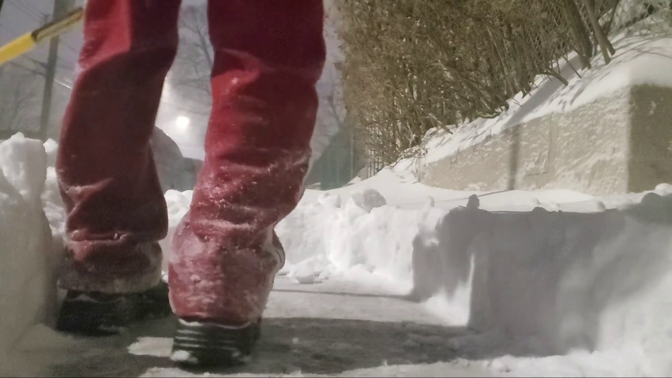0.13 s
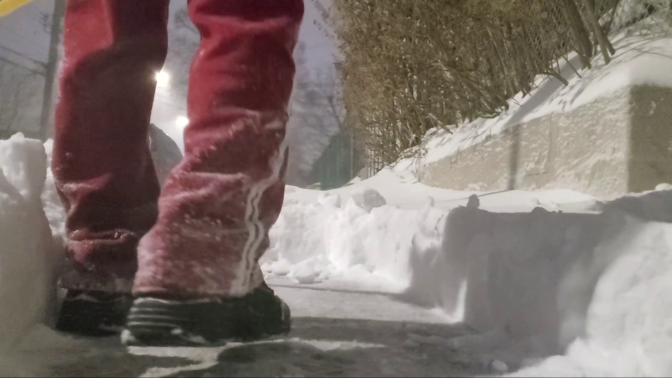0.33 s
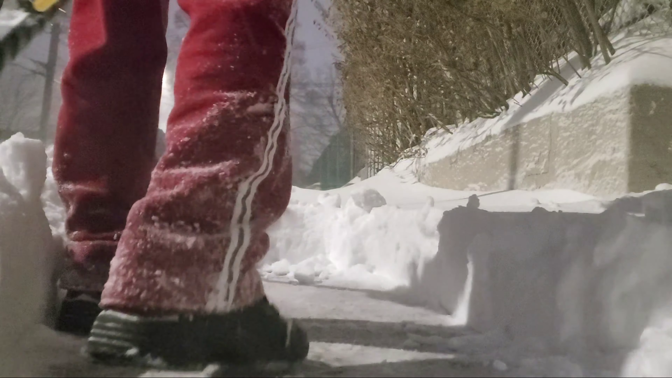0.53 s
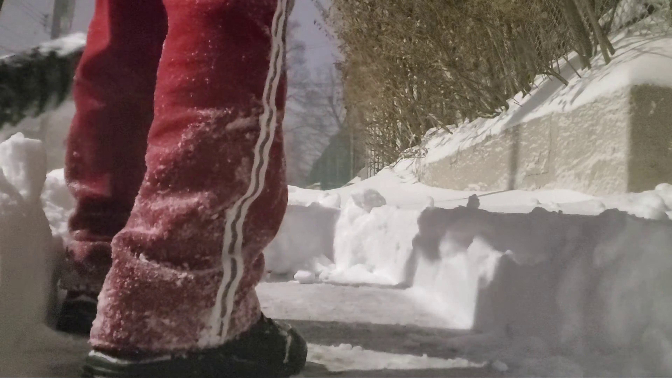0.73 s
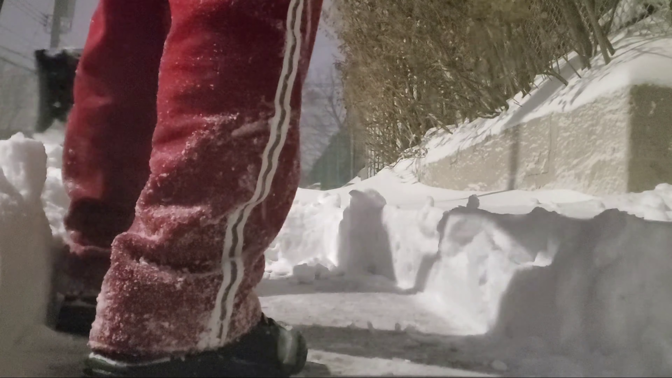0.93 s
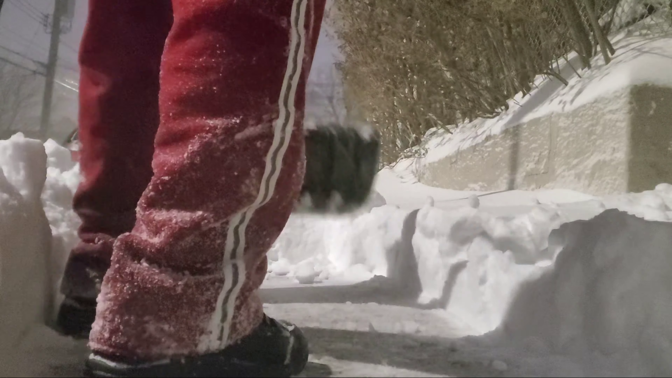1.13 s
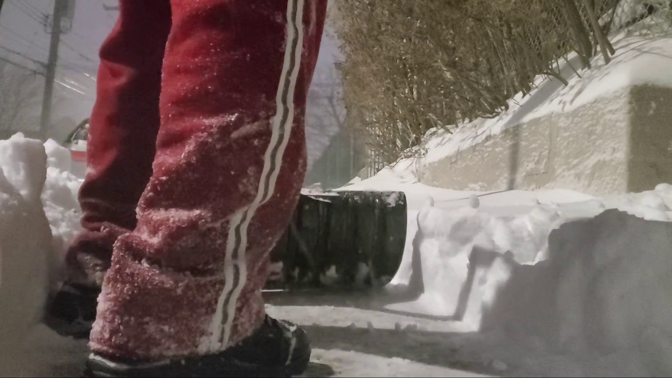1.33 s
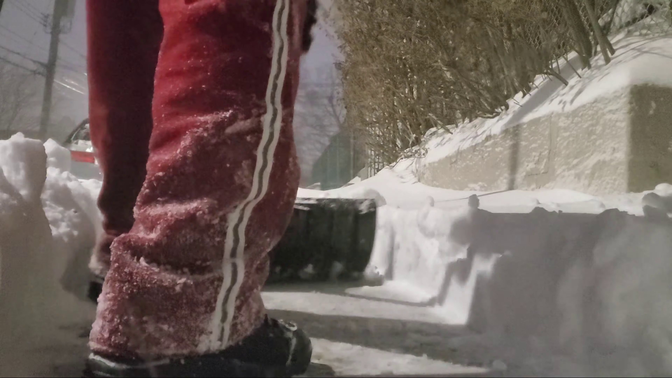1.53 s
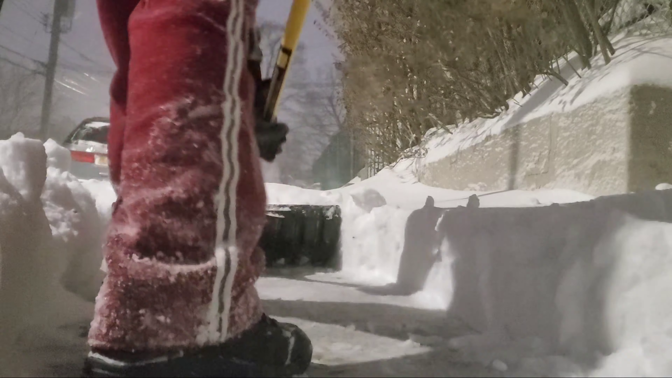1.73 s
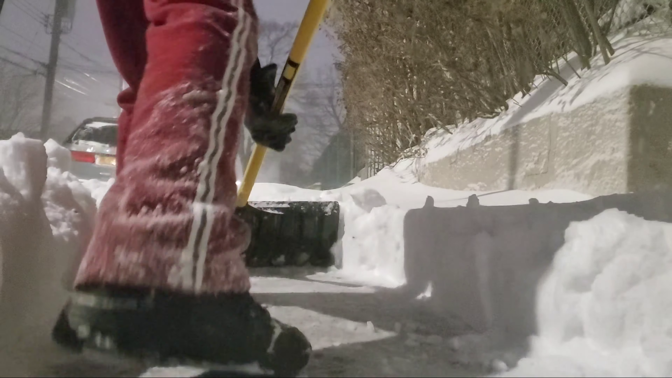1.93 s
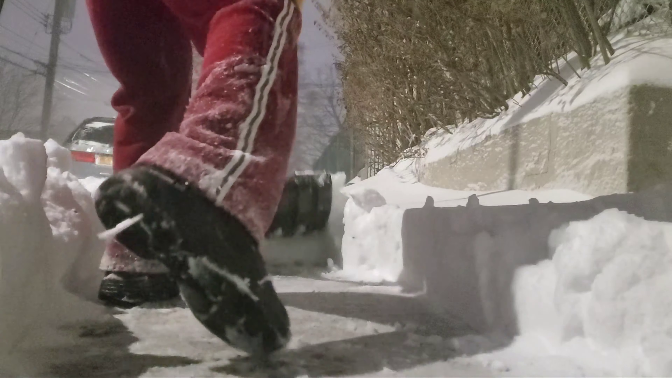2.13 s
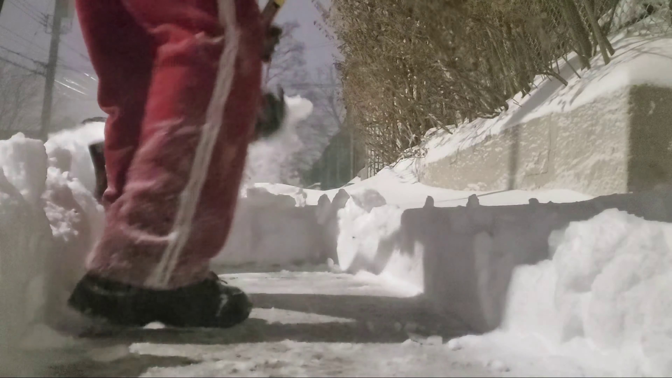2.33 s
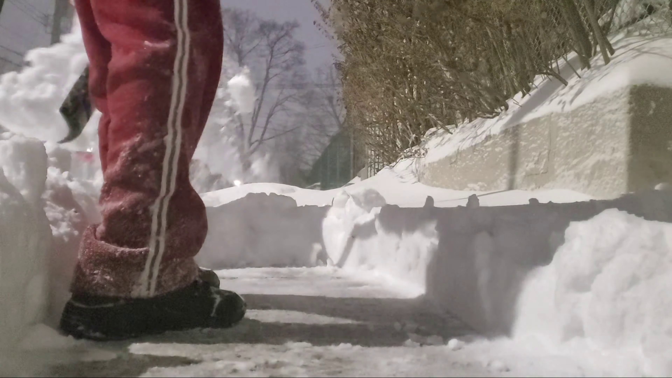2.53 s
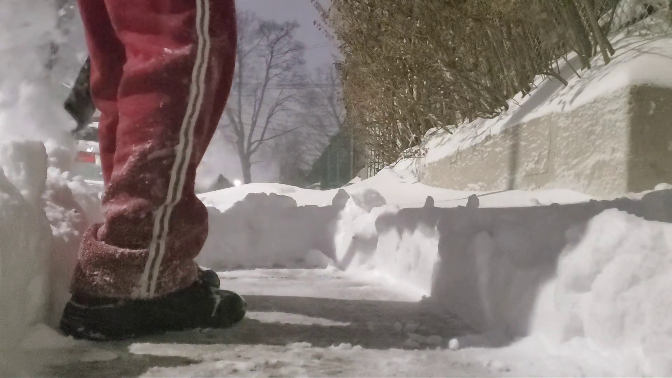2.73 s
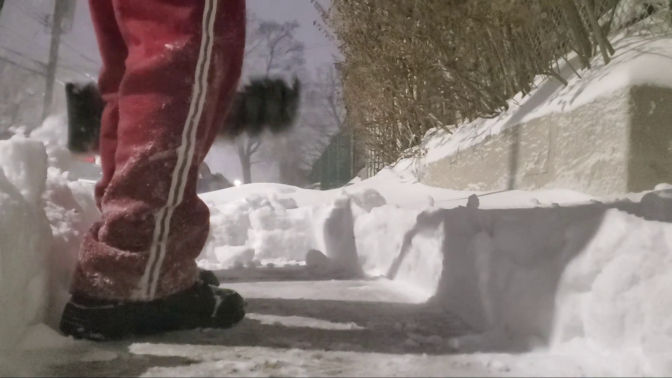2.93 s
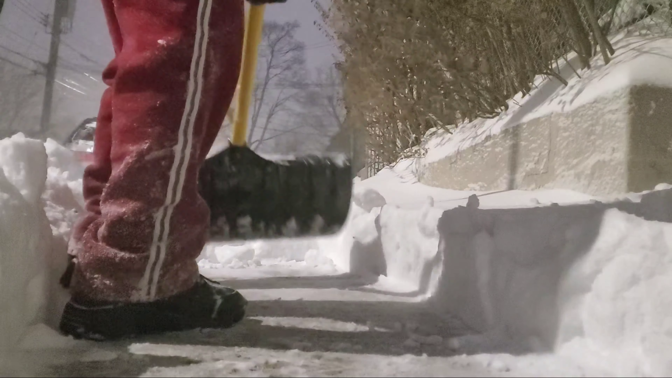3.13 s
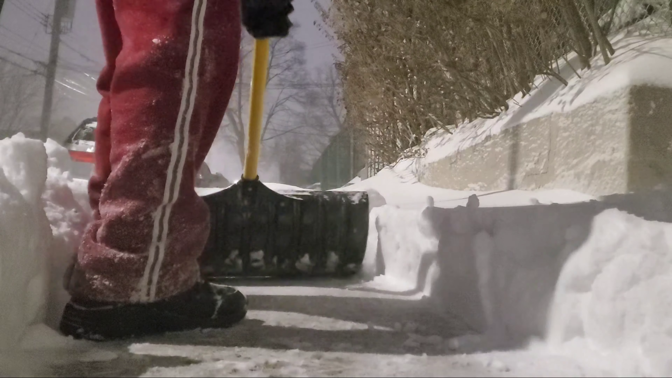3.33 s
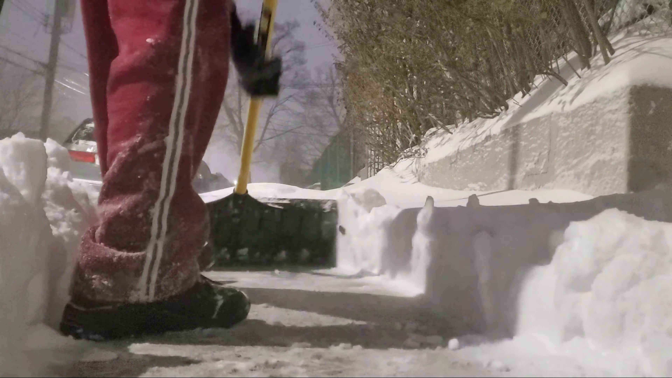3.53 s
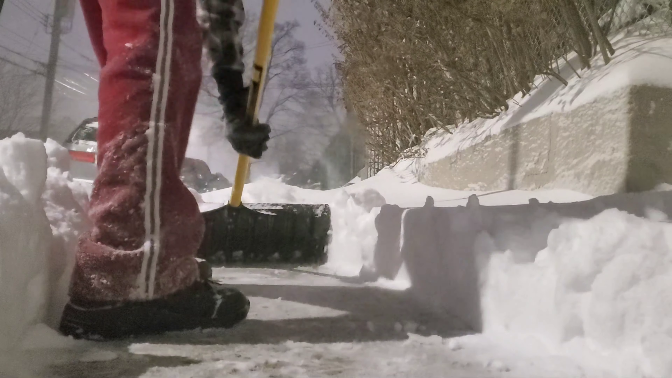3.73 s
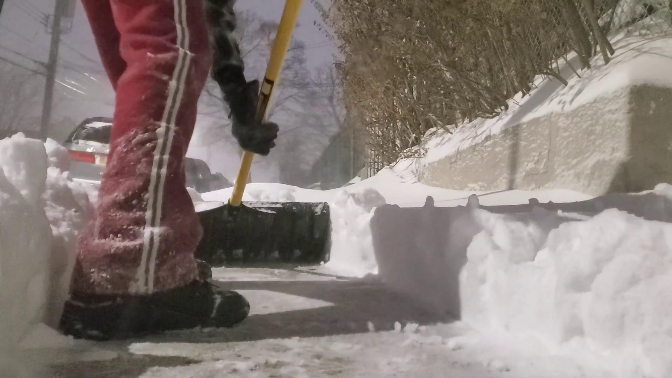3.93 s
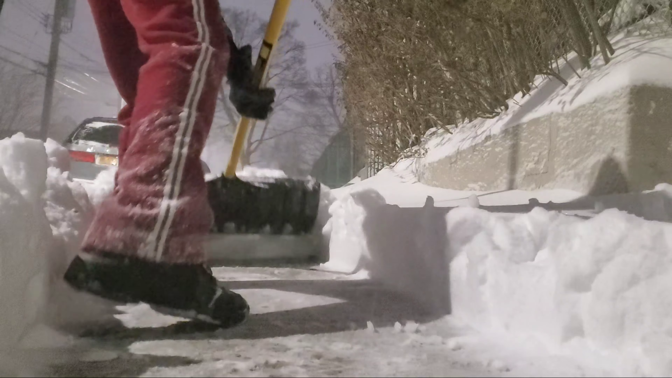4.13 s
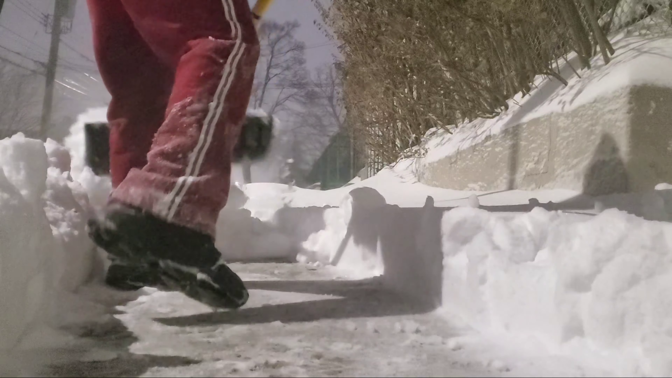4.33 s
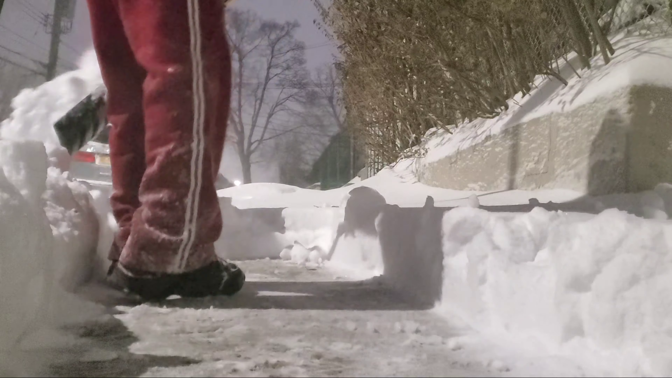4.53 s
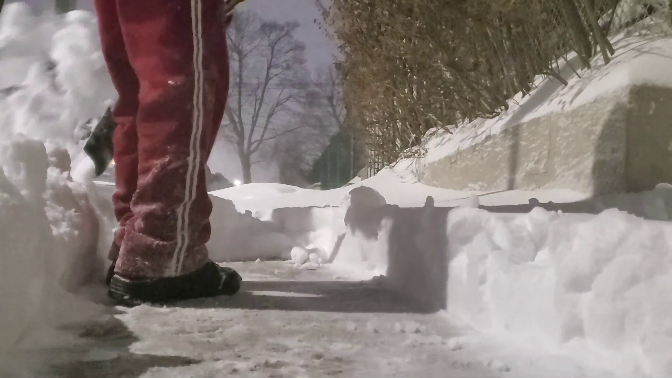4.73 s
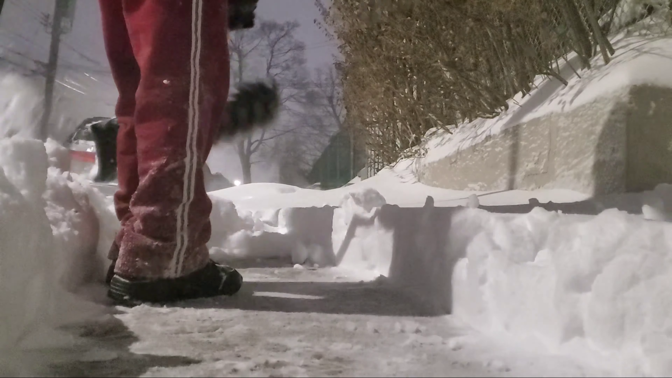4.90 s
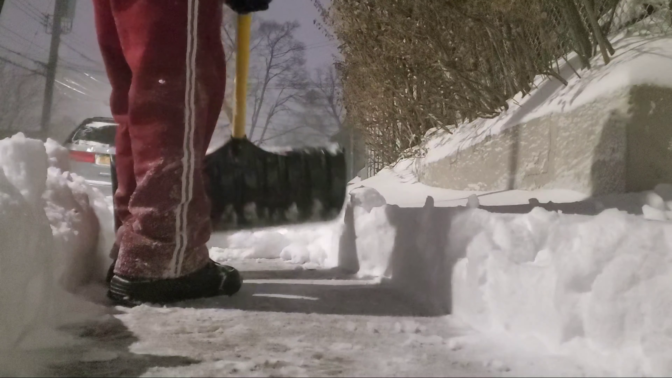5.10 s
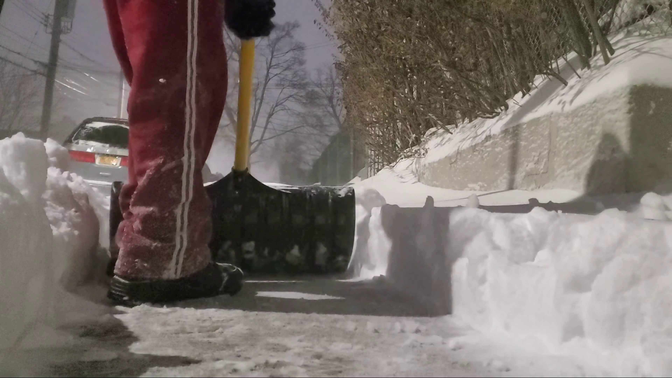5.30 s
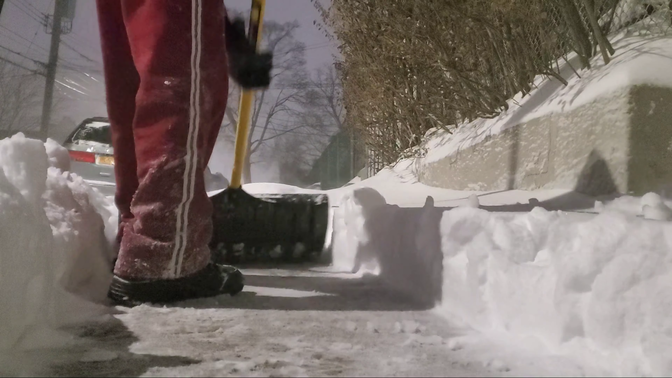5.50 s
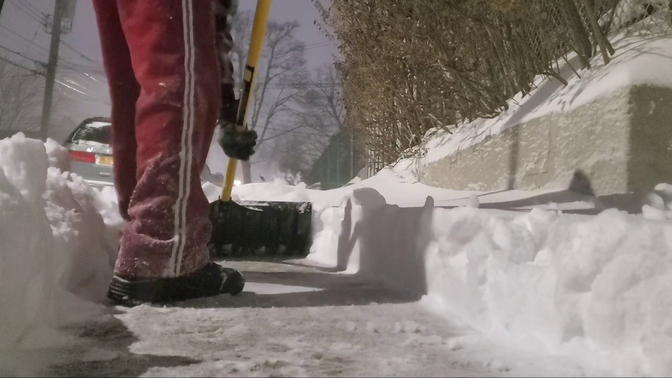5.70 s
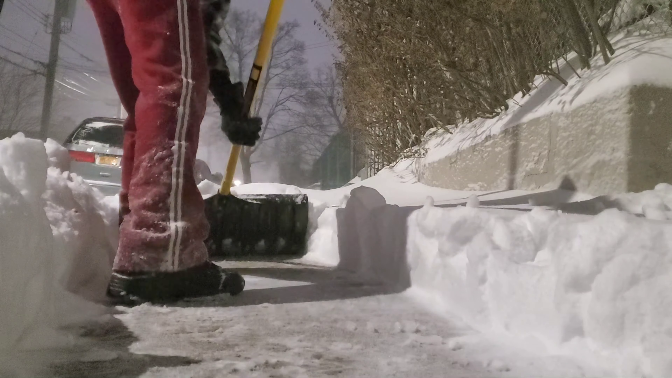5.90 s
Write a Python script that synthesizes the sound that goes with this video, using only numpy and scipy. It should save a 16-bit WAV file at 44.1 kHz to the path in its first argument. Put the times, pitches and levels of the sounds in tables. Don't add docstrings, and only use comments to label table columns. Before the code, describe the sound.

Three brief, loud shovel scrapes, crackling and thudding over a rough icy path, break through low wind rumble, faint hiss and ticking snowflakes.

```python
import sys
import numpy as np
from scipy import signal
from scipy.fft import rfft, irfft, next_fast_len
from scipy.io import wavfile
from scipy.ndimage import uniform_filter1d

SR = 44100
rng = np.random.default_rng(int(sys.argv[2]) if len(sys.argv) > 2 else 0)


def field_ratio(decibels):
    return 10 ** (np.asarray(decibels, dtype=float) / 20)


def dump(signal):
    limited = np.clip(np.atleast_2d(signal).T, -1, 1)
    pcm = np.round(limited * 32767).astype(np.int16)
    wavfile.write(sys.argv[1], SR, pcm)


N = 267113

# t/s, level/dB
WIND = [(0, -47.5), (.4, -48.5), (.72, -56), (1.05, -50), (1.9, -48), (2.3, -53), (3.0, -49), (3.9, -50.5),
        (4.5, -52), (5.1, -44), (5.85, -47), (6.06, -50)]
# f/Hz, level/dB
RUMBLE = [(8.8, -49.5), (15, -14.5), (43, -6.5), (65, -0.5), (93, 0), (129, -9), (150, -15.5), (200, -40.5),
          (330, -120)]


def colour(x, points):
    hz, db = np.transpose(points)
    size = next_fast_len(N + 8192)
    grid_hz = np.arange(4097) * SR / 8192
    log_gain = np.interp(np.log(grid_hz + 1), np.log(hz), db) * np.log(10) / 20
    cepstrum = irfft(log_gain)
    cepstrum[1:4096] *= 2
    cepstrum[4097:] = 0
    impulse = irfft(np.exp(rfft(cepstrum)))
    y = irfft(rfft(x, size) * rfft(impulse, size), size)[..., :N]
    return y / np.sqrt(np.mean(y ** 2))


def track(tables, column, rest):
    t, out = np.arange(N) / SR, np.full(N, float(rest))
    for rows in tables:
        rows = np.array(rows)
        inside = (t >= rows[0, 0]) & (t <= rows[-1, 0])
        out[inside] = np.interp(t[inside], rows[:, 0], rows[:, column])
    return uniform_filter1d(out, size=200)


def walk(rate):
    hold = int(SR / rate)
    steps = np.repeat(rng.standard_normal(N // hold + 1), hold)
    return 1.97 * uniform_filter1d(uniform_filter1d(steps, hold), hold)[:N]


def grains(rate, spread_db, bed):
    when, size = rng.random(N), rng.exponential(size=N)
    sign, noise = np.sign(rng.random(N) - 0.5), rng.standard_normal(N)
    clicks = (when < rate / SR) * field_ratio(spread_db * np.minimum(size, 5)) * sign
    return clicks / np.std(clicks) + bed * noise


def ports(source, alike):
    alike = np.clip(alike, 0, 1)
    mid, side = source(), source()
    return (np.sqrt(1 + alike) * mid + np.sqrt(1 - alike) * side * np.array([[1], [-1]])) / np.sqrt(2)


def add(out, s, piece):
    i = int(s * SR)
    out[..., i:i + piece.shape[-1]] += piece[..., :N - i]


def wind():
    # f/Hz, level/dB
    rush_colour = [(82, -27), (140, -8), (162, -6), (199, -6.5), (395, -14.5), (663, -25.5), (1000, -41),
                   (1300, -67.5), (2200, -120)]
    # t/s, peak level/dB, f/Hz
    buffets = [(0.027, -36, 88.4), (0.451, -37.5, 70.4), (0.573, -31.5, 87), (0.86, -51, 61.9),
               (1.197, -40.5, 109), (2.158, -33, 71), (2.887, -43, 85.5), (2.986, -35, 75),
               (3.076, -31.5, 68), (3.146, -36.5, 99.6), (3.229, -42.5, 67.3), (3.86, -31.5, 115),
               (4.051, -31.5, 84.63), (4.116, -34, 68), (4.375, -36, 61.5), (4.661, -31.5, 64.6),
               (4.775, -41, 61.4), (4.902, -37, 96.5), (5.067, -40, 75.4), (5.161, -31, 96),
               (5.892, -39, 85.6)]
    deep_colour = [(12, -8.0), (30, 0.0), (50, -1.5), (75, -20.5), (150, -58.0)]  # f/Hz, level/dB

    throb_db = 2.2 * walk(25)
    rumble = ports(lambda: colour(grains(90, spread_db=2.5, bed=0.6), RUMBLE), 0.45)
    rush = ports(lambda: colour(rng.standard_normal(N), rush_colour), 0.77)
    deep = ports(lambda: colour(rng.standard_normal(N), deep_colour), 0.23)
    wind_db = track([WIND], column=1, rest=-53)
    rush_db = -54 + 0.72 * (wind_db + 49) + 0.35 * throb_db + 1.5 * walk(40)
    out = rumble * field_ratio(wind_db + throb_db + 4.0) + rush * field_ratio(rush_db)
    out += deep * field_ratio(-55 + 0.6 * (wind_db + 49.5))

    t = np.arange(4000) / SR
    for s, db, hz in buffets:
        swing = np.sin(2 * np.pi * hz * t) * t * hz * np.exp(1 - (t * hz / 0.93) ** 2)
        lean_db = 3.5 * rng.standard_normal() * np.array([[1], [-1]])
        add(out, s + 0.0085, swing / np.abs(swing).max() * field_ratio(db + lean_db))
    return out


def duck_db():
    duck, recover_s = 2.5, 1
    memory = np.exp(-1 / (recover_s * SR))
    speed_db, _, _ = pushes()
    loud = signal.lfilter([1 - memory], [1, -memory], field_ratio(speed_db))
    return -duck * loud / loud.max()


def housing():
    # f/Hz, level/dB
    hiss_colour = [(530, -32), (900, -3), (1170, -3.5), (2270, -4.5), (5040, -7.5), (6640, -3.5),
                   (7580, -16), (9420, -9), (10800, -13.5), (14900, -8.5), (16000, -21)]
    # t/s, peak level/dB, left minus right level/dB
    flakes = [(0.4352, -44, 5), (1.1803, -36, 13), (2.1455, -29, 7), (2.2468, -44, 6), (2.3386, -42, 7.5),
              (2.5094, -41, 7.5), (2.6977, -35.5, 13), (2.8544, -47, 6), (2.8787, -38, 4.5),
              (2.9406, -41.5, 9), (3.0612, -36, 13), (3.106, -37, 15), (3.1487, -36, 15),
              (3.1656, -41.5, -2.5), (3.2562, -37, 11), (3.2877, -38.5, 15), (3.8661, -48, 8.0),
              (4.5296, -38, 13), (4.558, -36, 17), (4.815, -42, 3.5), (4.8721, -39, 8), (4.9196, -35.5, 10),
              (5.087, -37, 1), (5.187, -39, 10), (5.2784, -35, 16.5), (5.7424, -42, 6),
              (5.9967, -41.5, 9.5)]

    wind_db = track([WIND], column=1, rest=-57)
    hiss_db = -63 + duck_db() + 0.24 * (wind_db + 50) + 0.55 * walk(5.8)
    hiss = colour(rng.standard_normal((2, N)), hiss_colour) * field_ratio(hiss_db)

    ticks, t = np.zeros((2, N)), np.arange(200) / SR
    for s, db, pan_db in flakes:
        tick = rng.standard_normal((2, 200)) * np.exp(-t / 0.0004)
        port_db = np.array([[0], [-0.6 * pan_db]])
        add(ticks, s, tick / np.abs(tick).max() * field_ratio(db + 2.5 + port_db))
    faint = np.array([grains(25, spread_db=1.5, bed=0), grains(25, spread_db=4.5, bed=0)]) * field_ratio(-78)
    bright = signal.butter(2, 4500, "highpass", fs=SR, output="sos")
    return hiss + signal.sosfilt(bright, ticks + faint)


def powder():
    # t/s, level/dB
    snowfall = [
        (0, -66),
        (1.3, -64.5),
        (2.2, -70),
        (3.3, -69),
        (3.8, -83),
        (4.4, -84),
        (4.85, -64),
        (5.3, -70.5),
        (5.8, -73),
        (6.06, -75.5),
    ]
    dust = np.array([grains(500, spread_db=4, bed=1.5) for _ in range(2)])
    dust = signal.sosfilt(signal.butter(3, 8200, "highpass", fs=SR, output="sos"), dust)
    return dust / np.std(dust) * field_ratio(track([snowfall], column=1, rest=-75) + 3.3 * walk(12))


def rustles():
    # middle t/s, half length/s, level/dB, centre f/Hz, width/Hz
    moves = [(0.004, 0.028, -51, 4000, 6250), (0.176, 0.036, -60.5, 2300, 3010),
             (0.448, .035, -58, 6360, 9000), (0.602, 0.0064, -50, 1600, 900),
             (0.642, 0.089, -59, 1550, 905), (0.7, 0.094, -59.5, 5900, 9050),
             (1.282, 0.15, -64.5, 3450, 450), (1.294, 0.055, -59, 830, 200),
             (1.843, 0.058, -52.5, 1500, 950), (2.082, 0.034, -56.5, 1130, 1190),
             (2.092, 0.042, -52, 3130, 2600), (2.152, 0.023, -54, 3600, 3500),
             (2.35, 0.026, -58.5, 6800, 9000), (2.483, 0.0089, -61.5, 2500, 3500),
             (2.418, .05, -62, 1520, 900), (4.598, 0.055, -70, 2050, 255), (4.642, 0.14, -63.5, 3500, 6000),
             (5.21, 0.035, -53.5, 6250, 1490), (5.247, .07, -51, 1940, 3500),
             (5.248, .08, -56.5, 6900, 12200)]
    edge_db = 20

    crackle = ports(lambda: grains(5000, spread_db=-0.5, bed=0.9), 0.33) * field_ratio(1.2 * walk(60))
    out, t = np.zeros((2, N)), np.arange(N) / SR
    for s, half, db, hz, width in moves:
        near = np.abs(t - s) < 2 * half + 0.02
        ring = signal.iirpeak(hz, hz / width, SR)
        once = signal.lfilter(*ring, crackle[:, near])
        band = signal.lfilter(*ring, once) + 0.5 * once
        out[:, near] += band / np.std(band) * field_ratio(db - edge_db * ((t[near] - s) / half) ** 2)
    return out


def knocks():
    # t/s, thud peak level/dB, thud f/Hz, crack level/dB, crack centre f/Hz
    hits = [(0.031, -35.5, 404, -51, 1000), (0.592, -28, 243, -39.5, 2200), (1.35, -58, 151, -37, 5500),
            (1.365, -20.5, 310, -37, 1000), (1.536, -16, 328, -30, 1493), (1.579, -11, 300, -7, 2260),
            (1.596, -12, 600, -12.5, 1600), (1.6, -8, 384, -15, 2200), (1.605, -17, 635, -17.5, 1094),
            (1.637, -21, 444, -15.5, 1200), (1.621, -20.5, 496, -19.5, 3800),
            (2.146, -60, 300, -45.5, 3500), (3.38, -31.5, 304, -33.5, 6440), (3.391, 1.5, 370, -17.5, 1300),
            (3.403, -11, 201, -35, 897), (3.542, -7.5, 295, -18.5, 1500), (3.571, -17, 730.3, -10, 4850),
            (3.583, -11.5, 749, -31.5, 900), (5.318, -8.5, 320, -15, 5040), (5.378, -13, 361, -19.5, 1500),
            (5.413, -16.5, 638, -24, 3700), (5.442, -11, 313, -21, 3600), (5.46, -7.5, 384, -15, 2900),
            (5.498, -38, 277, -27, 3650)]
    thud_t60_s, contact_s, ground_hz = 0.023, 0.0015, 82

    out, t = np.zeros((2, N)), np.arange(4000) / SR
    late = np.maximum(t - 0.0012, 0)
    fade = np.exp(-np.log(1000) * t / thud_t60_s) * (1 - np.exp(-(t / contact_s) ** 2))
    boom = 0.19 * t / 0.0086 * np.exp(1 - t / 0.0063) * np.sin(2 * np.pi * ground_hz * t)
    burst = late / 0.00069 * np.exp(1 - late / 0.00082) + 0.11 * np.exp(-t / 0.0063)
    dull = signal.butter(4, 7400, fs=SR, output="sos")
    for s, db, hz, crack_db, crack_hz in hits:
        overtone = 0.97 * fade * np.sin(2 * np.pi * 2.1 * hz * t)
        thud = fade * (np.sin(2 * np.pi * hz * t) + overtone) + boom
        noise = (rng.standard_normal(4000) + 0.5 * rng.standard_normal((2, 4000))) * burst
        crack = signal.lfilter(*signal.iirpeak(crack_hz, 1.1, SR), noise) + 0.25 * noise
        crack = signal.sosfilt(dull, crack) + 0.1 * noise
        crack *= field_ratio(crack_db + 3.5) * field_ratio(np.array([[0.8], [-0.8]]))
        add(out, s, -thud / np.abs(thud).max() * field_ratio(db - 3.0) + crack)
    return out


def pushes():
    # t/s, scraping speed as level/dB, weight leaning on the blade as level/dB
    strokes = [
        [(1.342, -58, -19), (1.354, -52, 2), (1.43, -46.5, -7), (1.455, -39, 3.5), (1.54, -34, 6.5),
         (1.6, -29, 9), (1.7, -39, 0), (1.74, -52.5, 5), (1.79, -69, 12)],
        [(3.374, -59, -6), (3.385, -40.5, 12), (3.43, -34.5, -3), (3.5, -29.5, 4), (3.56, -25.5, 1),
         (3.63, -32.5, 5.5), (3.69, -41.5, -2), (3.725, -62.5, 12), (3.78, -72, 3.5)],
        [(5.312, -56.5, 25), (5.33, -44.5, 25), (5.39, -32, 2), (5.45, -24.5, 8), (5.53, -27, 7.5),
         (5.61, -31, 13), (5.66, -38.5, 0), (5.73, -57.5, -1), (5.79, -81.5, 8)],
    ]
    since = [[(rows[0][0], 0), (rows[-1][0], rows[-1][0] - rows[0][0])] for rows in strokes]
    speed_db = track(strokes, column=1, rest=-120)
    weight_db = track(strokes, column=2, rest=0)
    return speed_db, weight_db, track(since, column=1, rest=0)


def blade(x):
    # f/Hz, width/Hz, level/dB
    modes = [(93, 36, -13.5), (194, 62, -15.5), (268, 97, 3), (319.2, 22, 2.5), (390, 90, -15.5)]
    y = sum(field_ratio(db) * signal.lfilter(*signal.iirpeak(hz, hz / width, SR), x) for hz, width, db in modes)
    return y / np.std(y)


def shovel():
    # f/Hz, level/dB
    grit_colour = [(290, -25.5), (500, -7.5), (727, -1), (970, -6), (1110, -2.5), (1330, -5.5), (1510, -4),
                   (2400, -16), (3120, -34.5), (5280, -120)]
    # f/Hz, level/dB
    fine_colour = [(1290, -26), (2200, -7), (2570, -10), (2980, -3), (3260, -8), (4920, -9.5),
                   (5740, -14.5), (6760, -7.5), (7130, -11.5), (7800, -28.5), (10100, -50), (17200, -120)]
    # f/Hz, level/dB
    sizzle_colour = [(4590, -28.5), (7800, -2), (10600, -0.5), (11500, -1.5), (14400, -2.5), (15600, -5.5),
                     (16000, -19)]

    speed_db, weight_db, since = pushes()
    speed_db = speed_db + 0.7 * np.minimum(speed_db + 75, 0)
    bumps_db = 0.41 * walk(60)

    drone_db = speed_db + weight_db + 1
    drone_db += np.minimum(drone_db + 48, 0)
    drone = ports(lambda: blade(grains(600, spread_db=2.5, bed=0.9)), 0.96)
    drone = drone * field_ratio(drone_db + 0.48 * bumps_db)

    grit_db = speed_db + 0.38 * weight_db - 2 + bumps_db + 2.6 * walk(130)
    grit = ports(lambda: colour(grains(2500, spread_db=2.5, bed=0.9), grit_colour), 0.92) * field_ratio(grit_db)

    fine_db = speed_db + 3.5 + 0.54 * bumps_db + 0.68 * walk(120)
    fine = ports(lambda: colour(grains(3000, spread_db=2.5, bed=0.53), fine_colour), 0.75) * field_ratio(fine_db)

    muffle_db = 27 * since + 0.23 * np.clip(weight_db, 0, 12)
    sizzle_db = -27.5 + 0.94 * (speed_db + 31) - muffle_db - 6
    sizzle = ports(lambda: colour(grains(4000, spread_db=-5.0, bed=1.0), sizzle_colour), 0.02)
    sizzle = sizzle * field_ratio(sizzle_db + 0.89 * bumps_db)

    ground_db = speed_db + 0.76 * weight_db - 18.5
    ground = ports(lambda: colour(rng.standard_normal(N), RUMBLE), 0.75) * field_ratio(ground_db)

    pan_db = 2
    return (drone + grit + fine) * field_ratio(np.array([[pan_db], [-pan_db]]) / 2) + sizzle + ground


def scene():
    right_lag_s = 5e-5
    work = shovel() + knocks() + rustles()
    work[1] = np.interp(np.arange(N) - right_lag_s * SR, np.arange(N), work[1])
    return work + wind() + housing() + powder()


def starve(x):
    starve_db = -18.5
    hz, _, z = signal.stft(x, SR, nperseg=1024)
    power = uniform_filter1d(np.mean(np.abs(z) ** 2, axis=0), size=5, axis=1)
    middle_power = power[(hz > 2300) & (hz < 7400)].mean(0)
    loud_enough = middle_power > field_ratio(-124)
    for low in np.arange(7700, 14700, 500):
        band = (hz >= low) & (hz < low + 500)
        luck_db = 5 * uniform_filter1d(rng.standard_normal(len(middle_power)), size=5)
        luck_db = luck_db + 4.5 * (low < 10500)
        threshold = middle_power * field_ratio(2 * (starve_db + luck_db)) * loud_enough
        z[:, band] *= power[band].mean(0) > threshold
    return signal.istft(z, SR, nperseg=1024)[1][:, :N]


def top_cut(x):
    return signal.sosfilt(signal.butter(12, 16450, fs=SR, output="sos"), x)


def record(dry):
    rounded = np.tanh(0.9 * dry) / 0.9
    cut = signal.sosfilt(signal.ellip(8, 0.2, 60, 15700, fs=SR, output="sos"), rounded)
    return top_cut(starve(cut))


dry = scene()
out = record(dry)
dump(out)
```